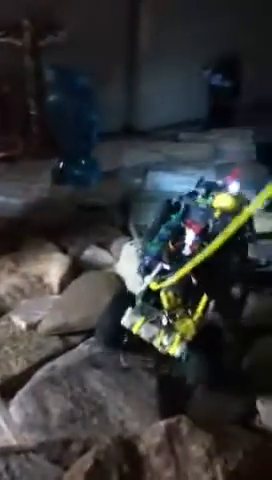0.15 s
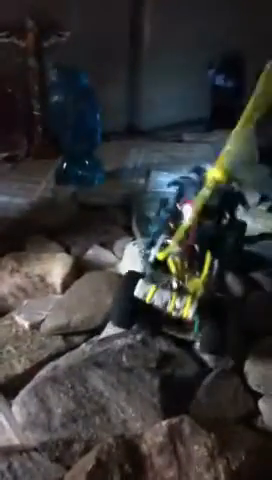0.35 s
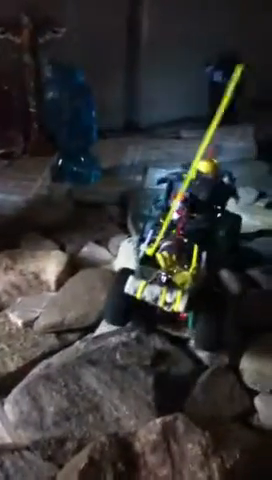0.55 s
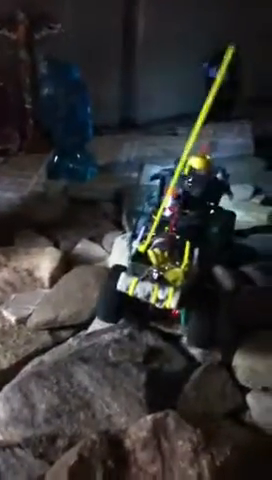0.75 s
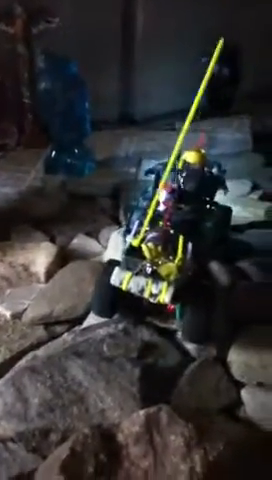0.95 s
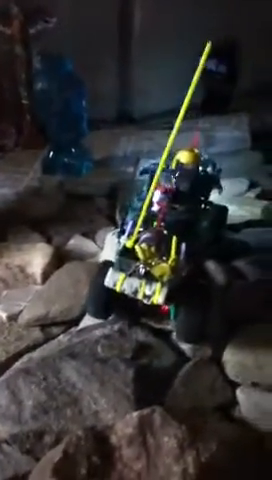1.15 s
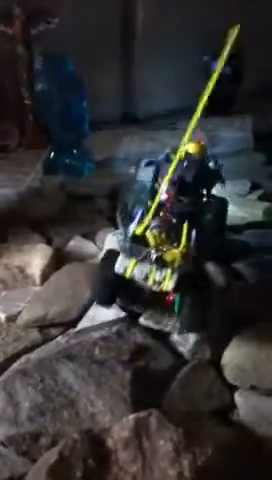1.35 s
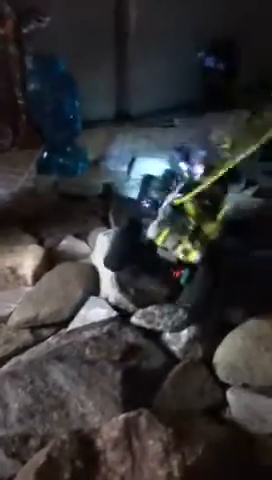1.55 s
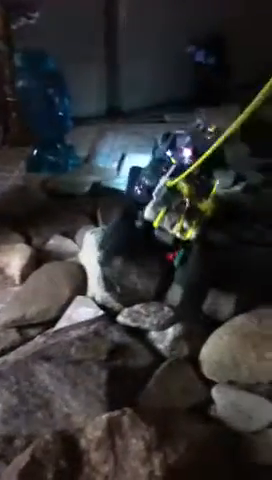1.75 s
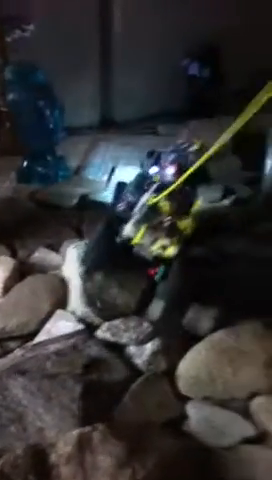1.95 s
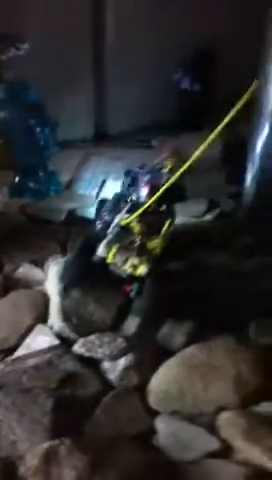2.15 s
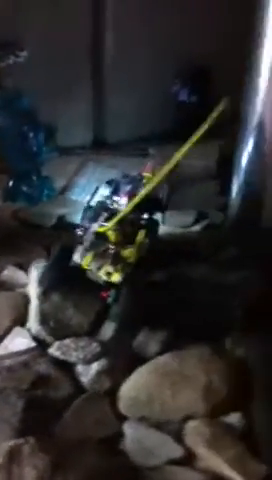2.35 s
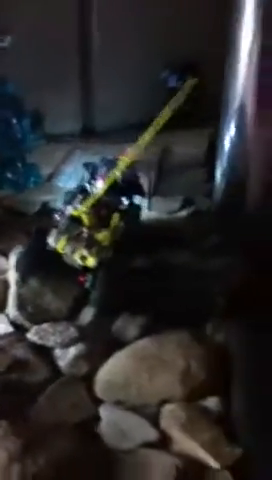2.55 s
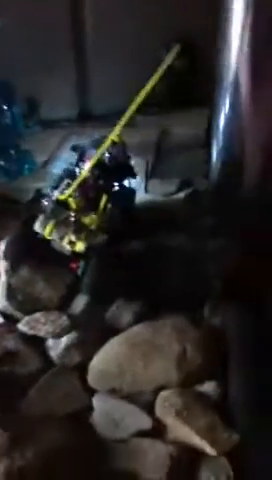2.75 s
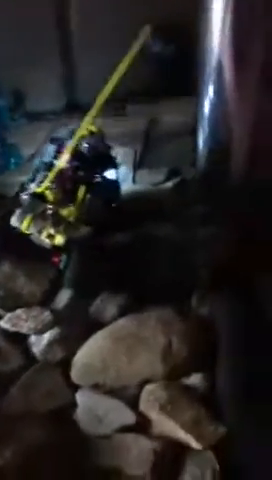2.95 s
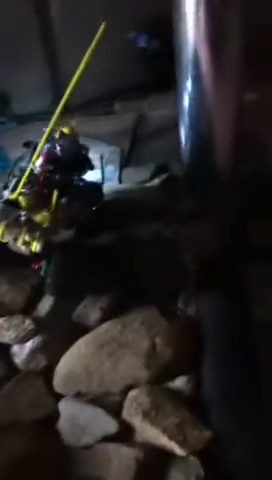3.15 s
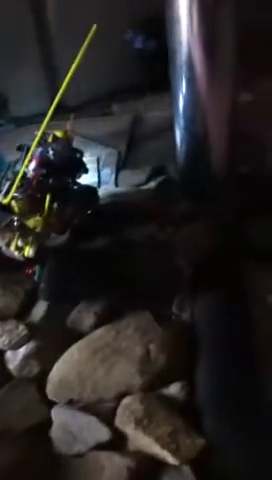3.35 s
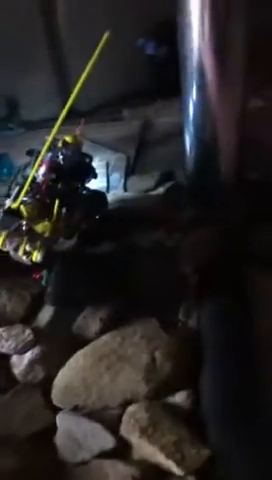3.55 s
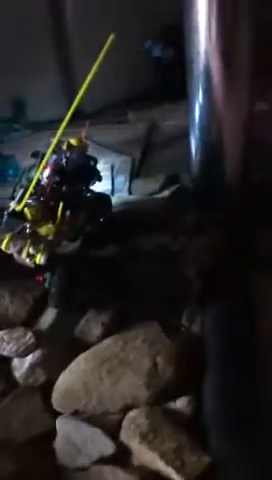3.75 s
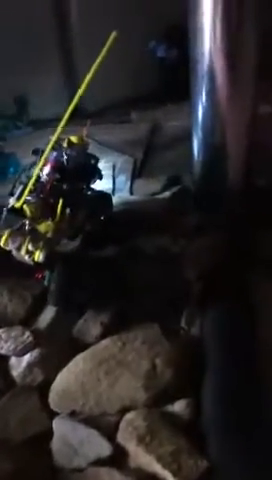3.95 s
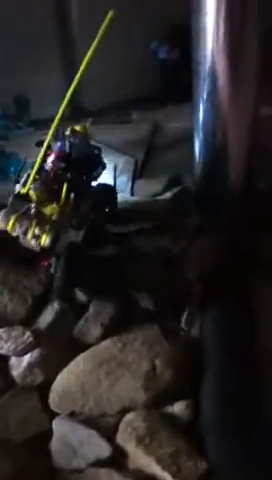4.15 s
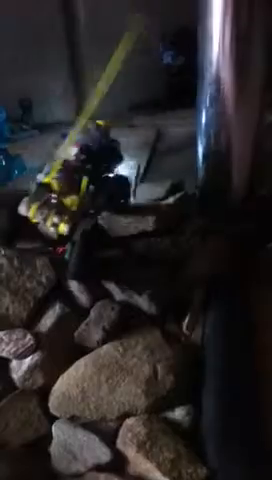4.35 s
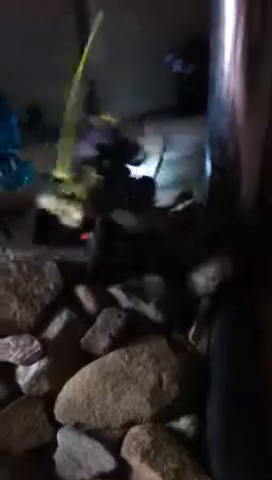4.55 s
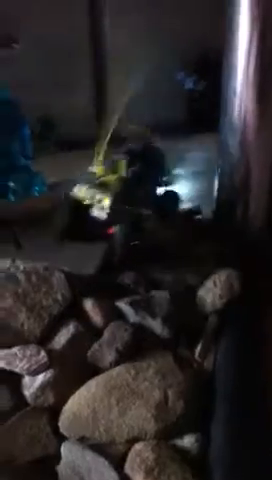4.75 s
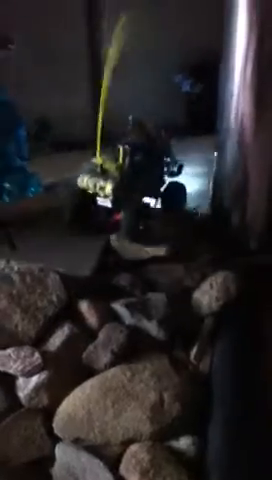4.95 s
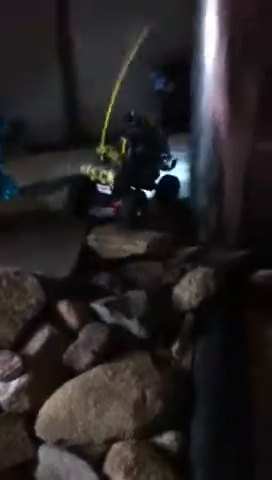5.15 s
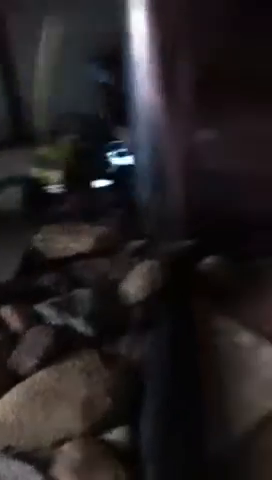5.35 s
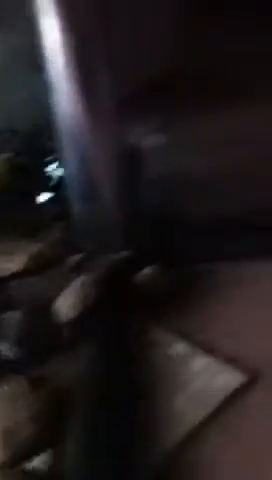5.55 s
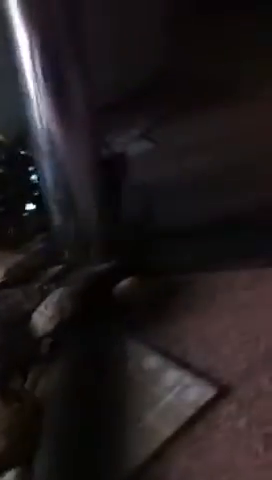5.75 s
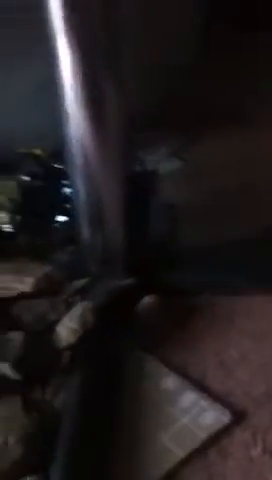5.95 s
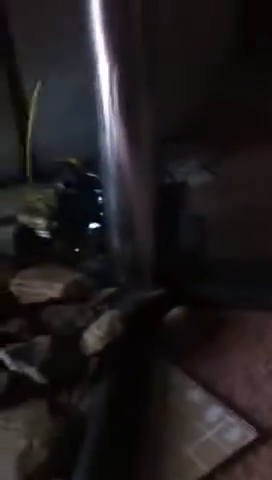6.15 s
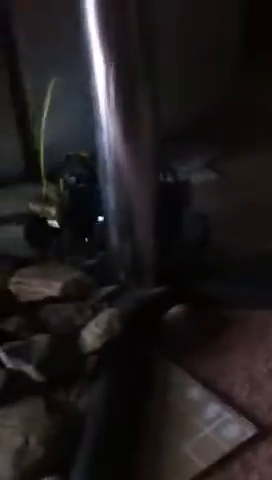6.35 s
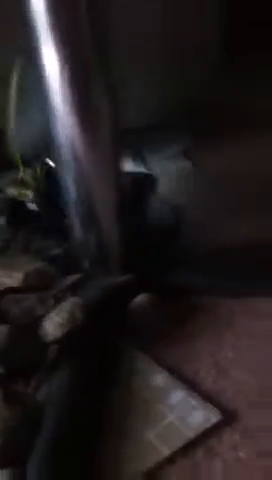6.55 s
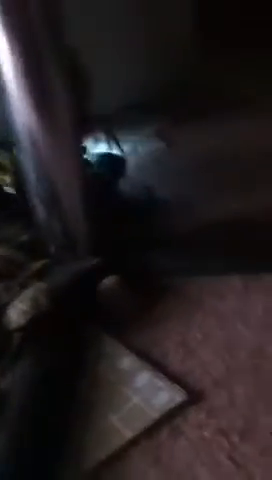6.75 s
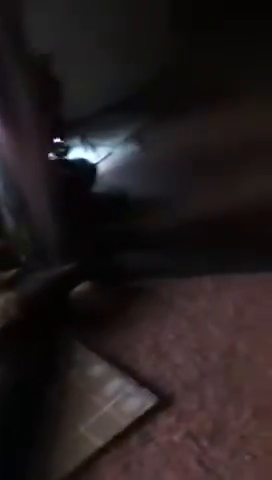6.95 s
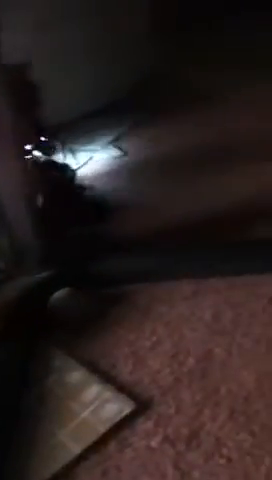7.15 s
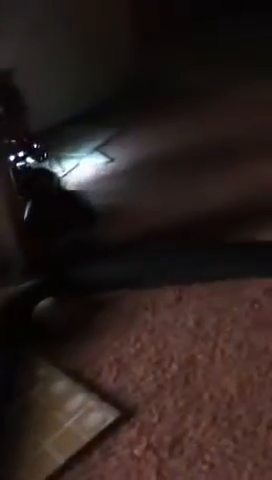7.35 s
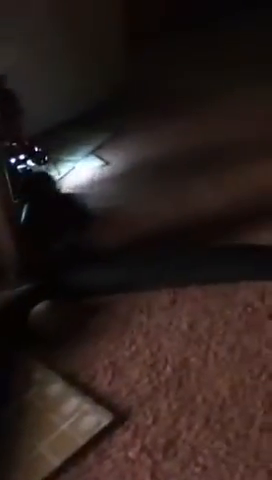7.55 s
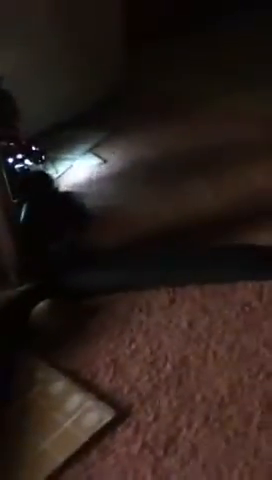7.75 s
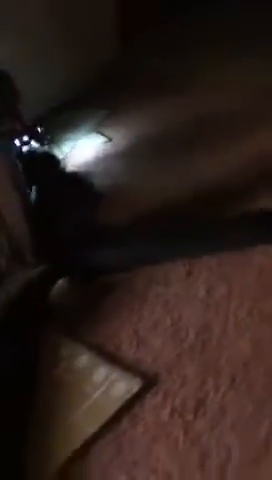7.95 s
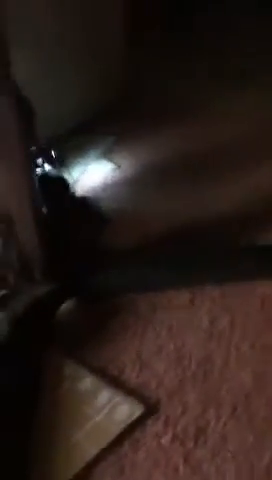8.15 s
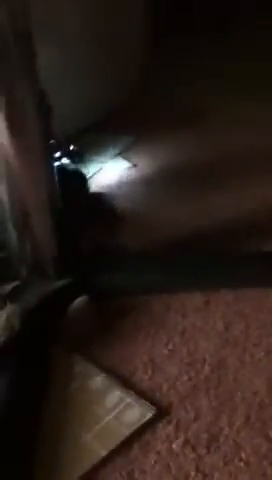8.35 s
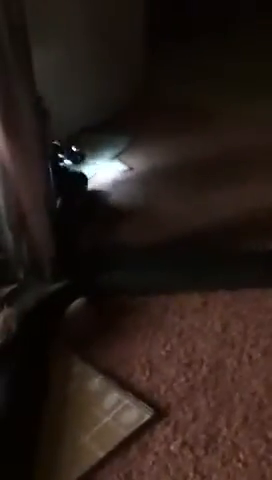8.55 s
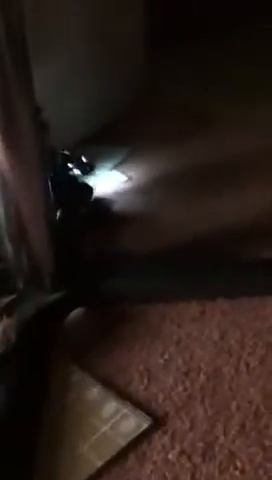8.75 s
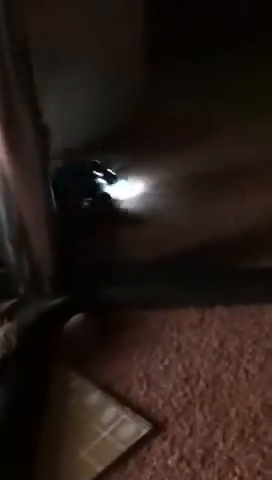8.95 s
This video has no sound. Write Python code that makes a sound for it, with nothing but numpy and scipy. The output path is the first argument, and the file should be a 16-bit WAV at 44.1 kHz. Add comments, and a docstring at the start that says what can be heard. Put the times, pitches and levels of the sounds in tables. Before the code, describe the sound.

Close by in a quiet room, a toy crawler's gears whir and rasp in five uneven bursts, rising and falling with speed. The early short spurts bring plastic ticks and a knock on stone, followed by a lull of thin motor whine and sizzle. Longer runs bring more knocks and soft tyre sounds. The microphone gets a single dry bump, then the gears speed up again.

```python
"""A small electric toy crawler climbs over rocks, close by in a quiet room: five bursts of throttle
and one faint nudge. Its gear teeth rasp in the plastic housing and throb once per turn of an
out-of-round gear, louder with speed and strain; chopped current makes the motor sing even when stalled.
The chassis knocks on stones, the drive ticks as it takes up slack, the tyres scrub and drop softly.
The mono microphone gets one bump; a few dull thuds and a low room tone lie behind."""
import sys
import numpy as np
from scipy import signal
from scipy.fft import rfft, irfft, next_fast_len
from scipy.io import wavfile
from scipy.ndimage import map_coordinates

SR = 44100
rng = np.random.default_rng(int(sys.argv[2]) if len(sys.argv) > 2 else 0)


def log_audio(samples):
    """Write samples as a 16-bit WAV file to the path given in sys.argv[1]."""
    # one column per channel
    frames = np.atleast_2d(samples).T
    # limit to full scale, then quantise
    limited = np.clip(frames, -1, 1)
    pcm = np.round(limited * 32767).astype(np.int16)
    wavfile.write(sys.argv[1], SR, pcm)


N = 400869
MESH_TEETH, PINION_TEETH, CRUISE_TURNS_PER_S = 55, 7, 24
CHOP_HZ, CHOP_JITTER_RAD = 476.9, 0.045

# gear speed, one curve per burst: (time [s], speed [turns/s])
GEAR_SPEEDS = [
    [(.075, 17.7), (.15, 18.7), (.25, 21.8), (.33, 21.7), (.41, 23), (.58, 17.5)],
    [(1.29, 20.7), (1.43, 16.6), (1.52, 24.5), (1.58, 25), (1.66, 29.9), (1.76, 22), (1.85, 23.2),
     (1.94, 19.4)],
    [(2.93, 22), (3.2, 25)],
    [(4.03, 7.9), (4.26, 13.1), (4.35, 23.5), (4.43, 35.4), (4.5, 20.2), (4.62, 10.4), (4.78, 13.2),
     (4.9, 20.4), (5, 33.6), (5.1, 36.9), (5.26, 38.8), (5.38, 27.4), (5.5, 26.2)],
    [(6.1, 19.5), (6.3, 18.9), (6.38, 27.9), (6.53, 28.9), (6.59, 41), (6.64, 35.5), (6.71, 30.6),
     (6.77, 29.2), (6.87, 17.1), (6.95, 23.8), (7.03, 24.5), (7.1, 22.3), (7.21, 26.2), (7.35, 13.4),
     (7.55, 6.8), (7.7, 7.2)],
    [(8.447, 14), (8.51, 14.3), (8.65, 28.2), (8.71, 32), (8.83, 27), (8.88, 28), (8.91, 33.3),
     (8.96, 35.5), (9, 42), (9.06, 45.5)],
]
# throttle: (start [s], length [s], gain at cruising speed [dB], attack [s], release t60 [s],
# gain per doubling of speed [dB], sizzle [dB], meshing tone [dB])
THROTTLE_BURSTS = [(.085, 0.35, -36, 0.018, 0.32, 27, -1.5, -21),
                   (1.29, .6, -39.5, 0.096, .11, 7, -2.5, -15),
                   (2.96, 0.15, -66.5, 0.05, 0.32, 4.5, 9.5, -22),
                   (4.03, 1.364, -42.5, 0.062, 0.39, 1.5, -1.5, -12),
                   (6.12, 1.55, -45, 0.1, 0.12, 8.5, -6.5, -9.5),
                   (8.488, .7, -47.5, 0.0087, .2, 4, -2, -10.5)]
# a wheel heaves over a stone and loads the gears, or drops free:
# (time [s], half width [s], level change [dB], sizzle change [dB])
WHEEL_STRAINS = [(.186, 0.033, 4, 0.5), (.27, 0.043, 2, 1), (.372, 0.033, 2.5, 3.5), (.447, 0.0096, 11, -6),
                 (1.394, 0.03, 2.5, -1.5), (1.45, 0.017, 2.5, -3), (1.507, 0.012, 1, 3),
                 (1.545, .014, 0.5, 3.5), (1.62, 0.04, -6.5, 6), (4.22, 0.13, -2, -3.5),
                 (4.348, 0.016, 4, 0.5), (4.418, 0.024, 0.5, 0.5), (4.58, 0.2, 3, 3),
                 (4.685, 0.0056, 0.5, 2), (4.84, 0.058, 4, 1.5), (5.299, 0.013, 6.5, -3.5),
                 (6.36, 0.17, 1, 5.5), (6.87, 0.056, 2, -4.5), (7.315, 0.034, -5.5, -1),
                 (8.69, 0.04, 2.5, 1)]
# plastic gearbox shell: (frequency [Hz], gain [dB])
HOUSING_RESPONSE = [(500, -24.5), (900, -21), (1250, -15), (1600, -7.5), (2150, -1.5), (2700, 0.5),
                    (3200, 0), (3800, 2), (4400, 0), (5200, -6.5), (6900, -8), (7650, -6), (8500, -11),
                    (12000, -13.5), (13500, -19), (15800, -29)]
# the housing's 3-5 kHz hump against the rest of the whirr: (time [s], gain [dB])
RASP_GAIN = [(.2, 5), (.35, 3), (1.47, 2.5), (1.62, 3), (1.95, -2), (3.1, 6.5), (4.05, -1.5), (4.2, -2),
             (4.4, 5), (4.7, -3), (4.85, 2), (5.17, -4), (5.36, 4.5), (6.3, -1), (6.5, -1.5), (6.6, -8),
             (6.75, -3.5), (7.1, -1.5), (8.6, -1.5), (9.05, 1.5)]
# how well the meshing tone radiates: (frequency [Hz], gain [dB])
MESH_RESPONSE = [(850, -22), (1300, -5), (2000, -1), (3300, 8), (6000, -4)]
# pitches the stones favour and cancel, place by place: (time [s], four peaks [Hz], dip [Hz])
STONE_COLOURS = [(.2, 2100, 3370, 3580, 4380, 2750), (.4, 2000, 3570, 3830, 4430, 2940),
                 (1.45, 1870, 2240, 3930, 4220, 2980), (1.77, 1760, 3100, 3190, 4370, 2930),
                 (4.2, 2140, 3850, 4200, 5430, 3020), (4.42, 1820, 3220, 3650, 4940, 2670),
                 (4.62, 2200, 3470, 5000, 5470, 3330), (5.03, 1940, 3050, 3470, 4670, 2454),
                 (5.35, 2080, 2930, 3720, 4430, 2630), (6.27, 2130, 2360, 3900, 4700, 2540),
                 (6.48, 3080, 3160, 3450, 4600, 2530), (6.74, 3150, 3300, 4300, 4900, 2450),
                 (6.88, 2210, 3200, 4050, 5000, 2720), (7.1, 1320, 2860, 3530, 3900, 1960),
                 (7.45, 2160, 2730, 3780, 4230, 3100), (8.58, 2720, 3160, 3850, 4430, 3400),
                 (8.85, 2830, 3100, 4030, 4550, 2150), (9.03, 2700, 3000, 3870, 5270, 4160)]
# current held on, driving or stalled; the pulse width picks the favoured overtone:
# (start [s], length [s], gain [dB], favoured pitch [Hz])
CURRENT_SPANS = [(-.05, .1, -58, 3120), (0.832, 0.24, -60.5, 3320), (1.09, 0.022, -66, 3815),
                 (1.118, 0.074, -63, 3380), (1.192, 0.058, -66, 3815), (1.252, .69, -61, 3130),
                 (2.59, 0.98, -64.5, 2680), (3.56, 0.59, -68, 2670), (4.082, 1.43, -56.5, 2500),
                 (5.52, 0.13, -62.5, 3780), (5.66, 0.5, -68, 2850), (6.104, 1.51, -62.5, 2560),
                 (8.517, .7, -59, 2820)]
# motor whine: (harmonic [x chopping rate], level [dB])
WHINE_HARMONICS = [(3, -30), (4, -14.5), (5, -15), (6, -14), (7, -10), (8, -12.5), (9, -20), (18, -15)]
# very narrow current pulses at the least throttle: (start [s], length [s], gain [dB], fade [dB/s])
NARROW_PULSE_SPAN = (2.62, 1, -64, 1)
# their thin ring: (harmonic [x chopping rate], level [dB])
NARROW_PULSE_RING = [(24, -13), (25, -11), (26, -17), (27, -15)]
# their hiss: (frequency [Hz], density [dB])
NARROW_PULSE_HISS = [(10400, -35), (11500, 0), (13000, -2), (13900, -30)]
# chassis hits a stone:
# (time [s], gain [dB], relative crack [dB], half the clatter's t60 [s], favoured pitch [Hz])
STONE_KNOCKS = [(0.408, -27.5, 0, 0.012, 790), (.427, -31, -20, 0.0074, 684),
                (1.445, -40.5, -9, 0.039, 550), (1.648, -10.5, -8, 0.0065, 1000),
                (1.921, -41, -4, 0.019, 550), (2.246, -42, -16, 0.13, 1680), (4.477, -29.5, -20, 0.01, 635),
                (4.876, -22.5, -11, 0.042, 960), (4.9031, -13.5, -3, 0.033, 780),
                (4.926, -36.5, 0, 0.031, 550), (5.146, -24.5, -15, 0.0092, 1370),
                (5.241, -37, -0.5, 0.034, 1380), (5.355, -36, -4, 0.024, 1380)]
# chassis resonances: (frequency [Hz], level [dB], t60 [s])
CHASSIS_MODES = [(290, 2.5, 0.03), (564.5, 2.5, 0.035), (746, 0.5, 0.02), (963, 0.5, 0.012),
                 (1414, -2.5, 0.021), (1570, 1, 0.014), (1830, -11, 0.015), (2740, -21, 0.011)]
# a tyre lands on a stone: (time [s], gain [dB], rise [s], favoured pitch [Hz])
TYRE_DROPS = [(6.389, -31.5, 0.0071, 1560), (6.528, -35.5, 0.0062, 1600), (6.646, -38.5, 0.01, 950)]
# plastic ticks from the drive: (time [s], gain [dB], t60 [s])
SLACK_TICKS = [(.065, -44, 0.044), (0.178, -33, 0.019), (0.38, -22, 0.044), (0.408, -23, 0.018),
               (0.495, -35, 0.021), (0.508, -46, 0.11), (0.552, -41, 0.044), (1.307, -40, 0.02),
               (1.332, -33.5, 0.016), (1.391, -43, 0.026), (2.41, -53, 0.074), (2.48, -55, .05),
               (3.575, -54, 0.11), (3.618, -44, 0.047), (3.767, -48.5, 0.092), (4.008, -41.5, 0.02)]
# bright suspension clicks: (time [s], gain [dB])
SPRING_CLICKS = [(0.447, -27.5), (0.459, -41), (1.692, -29), (1.857, -41)]
# colour of those clicks: (frequency [Hz], density [dB])
SPRING_SPECTRUM = [(2500, -25), (5400, -9), (6000, 7), (6800, -11), (10200, -3), (13000, -12), (15800, -20)]
# a tyre scrubs on stone: (time [s], level [dB])
SCRUB_LEVEL = [(4.55, -110), (4.78, -61.5), (4.95, -61.5), (5.05, -79), (5.25, -58.5), (5.5, -56.5),
               (5.65, -62.5), (5.8, -72), (5.95, -110)]
# colour of the scrubbing rubber: (frequency [Hz], density [dB])
SCRUB_SPECTRUM = [(350, -29), (550, 6.5), (680, 8), (950, -6.5), (1400, 0), (2000, -17), (4000, -43)]
# resonances of the microphone's body: (frequency [Hz], level [dB], t60 [s])
MIC_MODES = [(145, 0.5, 0.069), (214, 3, 0.078), (357, -13, 0.11), (597, -3, 0.048), (995, -5, 0.052),
             (1240, -6, .035), (1810, -5, 0.044), (1920, -0.5, 0.033), (2020, -4, 0.029), (4050, 2, 0.0089)]
# soft low thuds in the room: (time [s], level [dB])
ROOM_THUDS = [(0.486, -52), (2.571, -49), (2.611, -50.5)]
# the room's decay: (frequency [Hz], t60 [s])
ROOM_DECAY = [(200, 0.28), (2000, 0.1), (10000, 0.021)]
# room tone: (frequency [Hz], density [dB])
ROOM_TONE = [(15, -54), (25, -18), (59, -6.5), (96, 0), (205, -1.5), (241, -3), (276, -5), (361, -8),
             (905, -15), (1820, -15), (2260, -17), (2890, -14.5), (3880, -17), (11700, -19), (15800, -24.5)]


def gearbox(throb_db=2.4, flutter_db=1.7, grit_db=2.7, pinion_db=-7, lag_s=0.23):
    """Teeth strike unevenly and ring the housing; faster gears are louder and brighter."""
    speed, angle = gear_rotation()
    age, length, burst_db, attack, release, doubling_db, sizzle_db, mesh_db = held(THROTTLE_BURSTS)
    rasp_db, = curves(RASP_GAIN)
    strain_db, rattle_db = wheel_strain()
    octaves = np.log2(speed / CRUISE_TURNS_PER_S)
    # every tooth contact is a short scrape of its own strength
    scrape = unit(rng.standard_normal(N) * amp(grit_db * wobble(1400)))
    teeth = stone_echoes(stone_colour(scrape + amp(pinion_db) * pinion(angle)))
    growl = amp(-6 + 1.1 * octaves) * housing_band(teeth, 20, 2750)
    rasp = amp(rasp_db) * housing_band(teeth, 2750, 5100)
    lag_db = -6 * np.exp(-age / lag_s)  # loose parts take a moment to start rattling
    sizzle = amp(sizzle_db + rattle_db + lag_db + 0.5 * octaves) * housing_band(teeth, 5100, SR)
    # the out-of-round gear binds once per turn; momentum evens this out at speed
    bind_db = throb_db * (CRUISE_TURNS_PER_S / speed) ** 0.65 * np.cos(angle)
    envelope = (1 - np.exp(-(age / attack) ** 2)) * amp(-60 * np.maximum(age - length, 0) / release)
    level_db = burst_db + doubling_db * octaves + strain_db + bind_db + flutter_db * wobble(110)
    mesh = amp(mesh_db) * gear_whine(speed, angle)
    return envelope * amp(level_db) * (mesh + growl + rasp + sizzle)


def gear_rotation():
    """Speed [turns/s] and angle [rad] of the gear; each burst starts from the spot where it binds."""
    speed, angle = np.full(N, GEAR_SPEEDS[0][0][1]), np.zeros(N)
    for curve in GEAR_SPEEDS:
        first = round(curve[0][0] * SR)
        speed[first:] = curves(curve)[0][first:]
        angle[first:] = 2 * np.pi * np.cumsum(speed[first:]) / SR
    return speed, angle


def gear_whine(speed, angle, slip_rad=0.8, overtone_db=-4, chatter_db=3.5):
    """The meshing tone and its overtones glide with speed; backlash blurs them and makes them stutter."""
    phase = MESH_TEETH * angle + slip_rad * wobble(260)
    out = np.zeros(N)
    for k in (1, 2, 3):
        db = along(MESH_RESPONSE, k * MESH_TEETH * speed) + overtone_db * (k - 1)
        out += amp(db + chatter_db * wobble(90)) * np.cos(k * phase + 1.5 * wobble(60))
    return out


def pinion(angle, reseat_hz=65, points=100):
    """Rough flanks repeat each revolution and slowly reseat: partials that slide with the speed."""
    flanks = rng.standard_normal((int(N / SR * reseat_hz) + 2, points))
    laps = angle / (2 * np.pi) * MESH_TEETH / PINION_TEETH
    contact = [np.arange(N) / SR * reseat_hz, laps % 1 * points]
    return unit(map_coordinates(flanks, contact, mode="grid-wrap"))


def wheel_strain():
    """A wheel loads or frees the gears: bell-shaped swells and dips of level and sizzle [dB]."""
    level, sizzle = np.zeros(N), np.zeros(N)
    for s, width, db, sizzle_db in WHEEL_STRAINS:
        bell = np.hanning(round(4 * width * SR))
        add(level, s - 2 * width, db * bell)
        add(sizzle, s - 2 * width, sizzle_db * bell)
    return level, sizzle


def housing(hz):
    """Gain of the gearbox shell: a broad hump in the low treble."""
    return amp(along(HOUSING_RESPONSE, hz))


def housing_band(x, low_hz, high_hz):
    """One steep-sided band of x heard through the shell, at rms 1."""
    below = lambda hz, edge: 1 / (1 + (hz / edge) ** 24)
    return unit(filtered(x, lambda hz: housing(hz) * (below(hz, high_hz) - below(hz, low_hz))))


def stone_colour(x, boost_db=1.5, peak_width_hz=200, dip_depth=0.6, dip_width_hz=440):
    """The surrounding stones colour the gears, gliding from place to place as the toy moves."""
    hz, t, spectra = signal.stft(x, SR, nperseg=1024)
    bell = lambda centre, width: 1 / (1 + (2 * (hz - centre) / width) ** 2)
    times, gains = [], []
    for s, *peaks, dip_hz in STONE_COLOURS:
        boost = 1 + amp(boost_db) * sum(bell(peak, peak_width_hz) for peak in peaks)
        gains.append(boost * (1 - dip_depth * bell(dip_hz, dip_width_hz)))
        times.append(s)
    gliding = np.array([np.interp(t, times, gain) for gain in np.transpose(gains)])
    return signal.istft(spectra * gliding, SR)[1][:N]


def stone_echoes(x, echo_gain=0.22, delay_s=0.0028, drift_s=0.00012):
    """Two echoes off nearby stones; their paths drift as the toy rocks, so the colour shifts."""
    n = np.arange(N)
    delays = [k * delay_s + drift_s * wobble(5) for k in (1, 2)]
    return x + echo_gain * sum(np.interp(n - np.round(delay * SR), n, x) for delay in delays)


def motor(waver_db=1.7, stutter_db=2, buzz_db=-5, favour_db=9, favour_width_hz=370):
    """Chopped current shakes the windings: stuttering harmonics, the higher ones blurred, over a buzz."""
    t = np.arange(N) / SR
    phase = 2 * np.pi * CHOP_HZ * t

    def harmonic(k):
        stutter = np.sqrt(2) * amp(stutter_db * wobble(35))
        return stutter * np.sin(k * (phase + CHOP_JITTER_RAD * wobble(150)) + rng.uniform(0, 2 * np.pi))

    current = sum(amp(db) * switched(s, length) for s, length, db, _ in CURRENT_SPANS)
    favoured_hz = held(CURRENT_SPANS)[-1]
    favour = lambda k: favour_db * np.exp(-((k * CHOP_HZ - favoured_hz) / favour_width_hz) ** 2)
    whine = sum(amp(db + favour(k)) * harmonic(k) for k, db in WHINE_HARMONICS)
    buzz = amp(buzz_db) * unit(filtered(rng.standard_normal(N) * (1 + np.cos(phase)) ** 2, housing))
    # at the least throttle, very narrow pulses add a thin, fading sizzle
    start, length, sizzle_db, fade_db_per_s = NARROW_PULSE_SPAN
    fade = switched(start, length) * amp(sizzle_db - fade_db_per_s * np.maximum(t - start, 0))
    thin_ring = sum(amp(db) * harmonic(k) for k, db in NARROW_PULSE_RING)
    sizzle = amp(-3) * thin_ring + amp(-5) * noise(NARROW_PULSE_HISS)
    return current * amp(waver_db * wobble(4.04)) * (whine + buzz) + fade * sizzle


def chassis_knocks(clatter=0.89, rise_s=0.0018, body_db=1, low_cut_hz=440):
    """A blow and a brief clatter of loose parts ring the chassis, which is too small to radiate bass."""
    out, t = np.zeros(N), np.arange(SR // 5) / SR
    crack_noise = noise([(500, -1), (1500, 7.5), (3500, 4.5), (6000, -7), (15000, -51)])
    for s, db, crack_db, half_t60, favoured_hz in STONE_KNOCKS:
        fade = amp(-30 * t / half_t60) * (1 - np.exp(-t / rise_s))
        force = rng.standard_normal(len(t)) * fade
        force *= clatter / np.linalg.norm(force)
        force[0] += 1  # the blow itself
        body = signal.fftconvolve(force, chassis_ring(favoured_hz, t))[:len(t)]
        crack = crack_noise[round(s * SR):][:len(t)] * fade
        add(out, s, amp(db) * (amp(body_db) * body / np.abs(body).max() + amp(crack_db) * crack))
    return signal.sosfilt(signal.butter(3, low_cut_hz, "high", fs=SR, output="sos"), out)


def chassis_ring(favoured_hz, t, favour_db=6, width_hz=200):
    """The struck chassis rings; the point of contact favours some modes."""
    favour = lambda hz: favour_db * np.exp(-((hz - favoured_hz) / width_hz) ** 2)
    return ring([(hz, db + favour(hz), t60) for hz, db, t60 in CHASSIS_MODES], t, scatter_db=1)


def tyre_drops(band_hz=(470, 2100)):
    """Rubber cushions the landing: the chassis is shaken by a rounded push, with no crack."""
    out, t = np.zeros(N), np.arange(SR // 8) / SR
    for s, db, rise, favoured_hz in TYRE_DROPS:
        force = rng.standard_normal(2 * len(t) - 1)
        shake = signal.fftconvolve(force, chassis_ring(favoured_hz, t), "valid")
        thump = shake * t / rise * np.exp(-t / rise)
        add(out, s, amp(db) * 2 * thump / np.abs(thump).max())
    return signal.sosfilt(signal.butter(3, band_hz, "band", fs=SR, output="sos"), out)


def drive_ticks(gain_db=2, rise_s=0.0013, click_t60=0.049):
    """Slack in the drive closes with a snap that rings the housing; the suspension clicks higher."""
    slack, spring, t = np.zeros(N), np.zeros(N), np.arange(SR // 10) / SR
    pulse = lambda db, t60: amp(db + gain_db - 60 * t / t60) * (1 - np.exp(-t / rise_s))
    for s, db, t60 in SLACK_TICKS:
        add(slack, s, pulse(db, t60))
    for s, db in SPRING_CLICKS:
        add(spring, s, pulse(db, click_t60))
    return slack * noise(HOUSING_RESPONSE) + spring * noise(SPRING_SPECTRUM)


def tyre_scrub(judder_db=3):
    """Rubber grips and slips on stone."""
    scrub_db, = curves(SCRUB_LEVEL)
    return amp(scrub_db + judder_db * wobble(60)) * noise(SCRUB_SPECTRUM)


def mic_bump(s=8.0575, push_db=-15, width_s=0.00014, body_db=-34, low_cut_hz=90):
    """One sharp tap right on the microphone rings its body, close and dry."""
    out, t = np.zeros(N), np.arange(SR // 8) / SR
    push = np.exp(-(t / width_s - 2) ** 2)
    add(out, s - width_s, amp(push_db) * push)
    add(out, s + 2 * width_s, -amp(body_db) * ring(MIC_MODES, t, scatter_db=2))
    return signal.sosfilt(signal.butter(2, low_cut_hz, "high", fs=SR, output="sos"), out)


def room_thuds(pitch_hz=140, rise_s=0.01):
    """Dull, soft-edged thuds in the background, just above the room tone."""
    out, t = np.zeros(N), np.arange(SR // 5) / SR
    thud = t / rise_s * np.exp(1 - t / rise_s) * np.sin(2 * np.pi * pitch_hz * t)
    for s, db in ROOM_THUDS:
        add(out, s, amp(db) * thud)
    return out


def room_reverb(x):
    """A short diffuse tail reaches the microphone 5 ms late and dies sooner in the treble."""
    hz, t, spectra = signal.stft(rng.standard_normal(SR // 2), SR, nperseg=256)
    decay = amp(-60 * t / along(ROOM_DECAY, hz)[:, None])
    tail = signal.istft(spectra * decay, SR, nperseg=256)[1]
    return signal.fftconvolve(x, np.pad(tail, (SR // 200, 0)) / np.linalg.norm(tail))[:N]


def amp(db):
    """Decibels to gain."""
    return 10 ** (np.asarray(db) / 20)


def unit(x):
    """Scale to rms 1."""
    return x / np.sqrt(np.mean(x ** 2) + 1e-20)


def along(points, hz):
    """Read (frequency [Hz], value) points on a log axis."""
    freqs, values = np.transpose(points)
    return np.interp(np.log(hz + 1), np.log(freqs), values)


def curves(rows):
    """One value per sample for each column after the time."""
    times, *columns = np.transpose(rows)
    return [np.interp(np.arange(N) / SR, times, column) for column in columns]


def held(rows):
    """For each sample: the time since the latest row began, and that row's other columns."""
    rows, t = np.array(rows), np.arange(N) / SR
    latest = np.maximum(np.searchsorted(rows[:, 0], t, "right") - 1, 0)
    start, *columns = rows[latest].T
    return np.maximum(t - start, 0), *columns


def switched(start, length, ramp_s=0.006):
    """Gain that ramps up at the start, holds and ramps down."""
    t = np.arange(N) / SR
    return np.clip(np.minimum(t - start, start + length - t) / ramp_s + 0.5, 0, 1)


def wobble(rate):
    """A smooth random curve of rms 1, rate knots a second."""
    knots = rng.standard_normal(int(N * rate / SR) + 4)
    fine = np.arange(0, len(knots) - 1, 1 / 10)
    return unit(np.interp(np.arange(N) * rate / SR, fine, map_coordinates(knots, [fine])))


def filtered(x, response):
    """Filter x by a gain given as a function of frequency."""
    size = next_fast_len(N + SR // 2)
    return irfft(rfft(x, size) * response(np.fft.rfftfreq(size, 1 / SR)), size)[:N]


def noise(spectrum):
    """Noise of rms 1, coloured by (frequency [Hz], density [dB]) points."""
    return unit(filtered(rng.standard_normal(N), lambda hz: amp(along(spectrum, hz))))


def ring(modes, t, scatter_db):
    """Damped modes, struck at slightly random strengths."""
    return sum(amp(db + scatter_db * rng.standard_normal() - 60 * t / t60) * np.sin(2 * np.pi * hz * t)
               for hz, db, t60 in modes)


def add(track, s, sound):
    """Mix a sound into the track at time s."""
    part = track[round(s * SR):][:len(sound)]
    part += sound[:len(part)]


def scene(reverb_db=-15.5, room_tone_db=-57.5):
    """The toy close to one microphone, mostly direct sound, over a low steady room tone."""
    toy = gearbox() + motor() + chassis_knocks() + tyre_drops() + drive_ticks() + tyre_scrub()
    room_tone = amp(room_tone_db) * noise(ROOM_TONE)
    return (toy + amp(reverb_db) * room_reverb(toy) + mic_bump() + room_thuds() + room_tone)[None]


def record(dry, top_hz=15850):
    """The microphone's channel passes nothing above its band limit."""
    return filtered(dry[0], lambda hz: hz < top_hz)[None]


dry = scene()
out = record(dry)
log_audio(out)
```